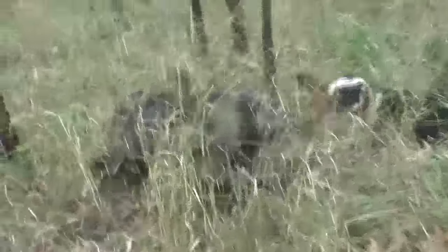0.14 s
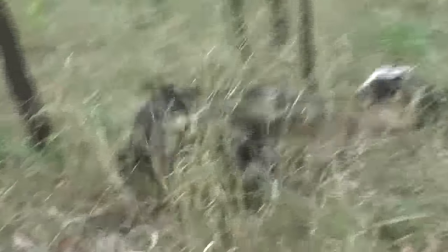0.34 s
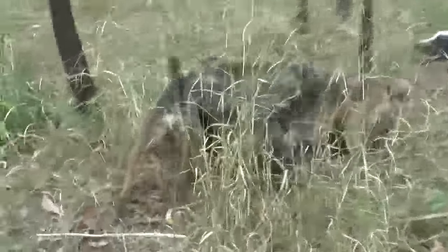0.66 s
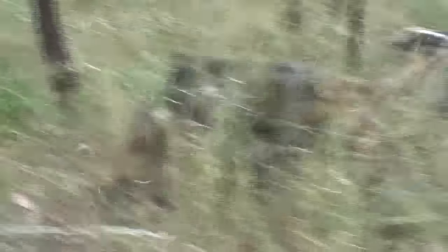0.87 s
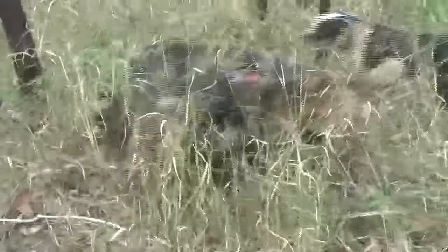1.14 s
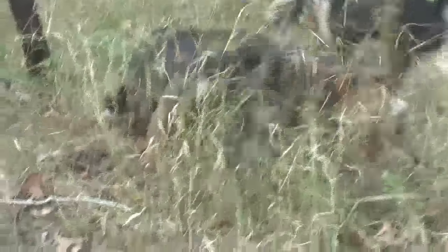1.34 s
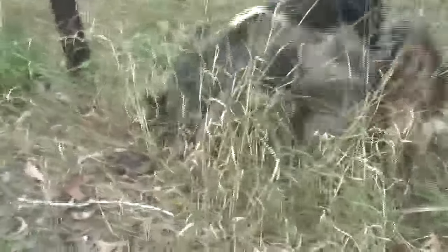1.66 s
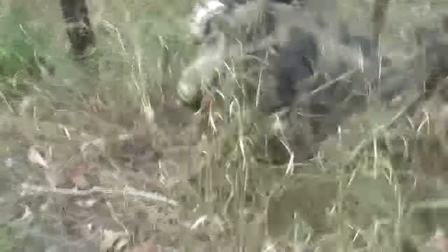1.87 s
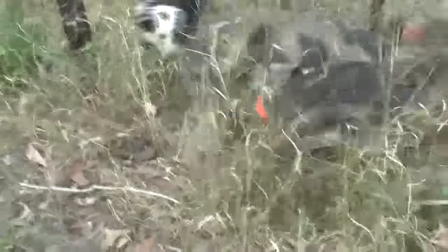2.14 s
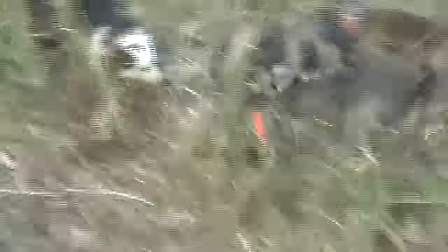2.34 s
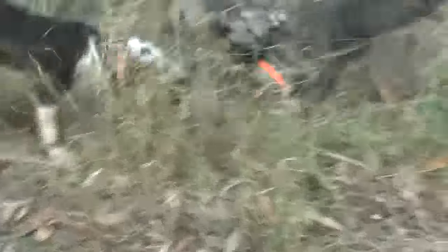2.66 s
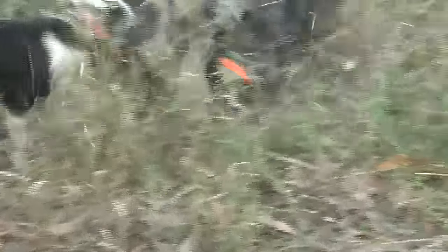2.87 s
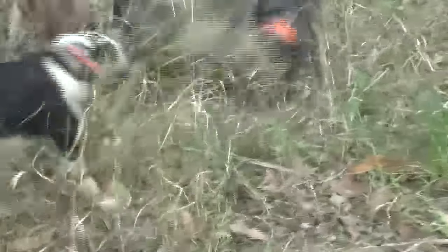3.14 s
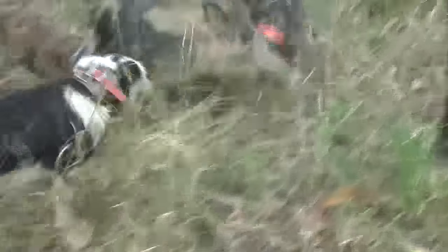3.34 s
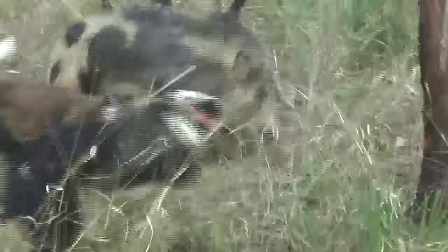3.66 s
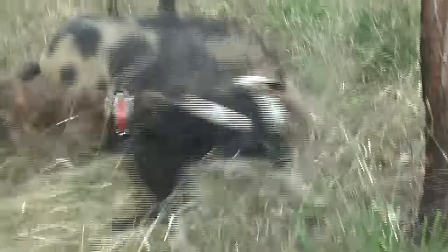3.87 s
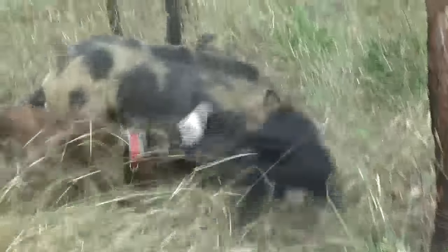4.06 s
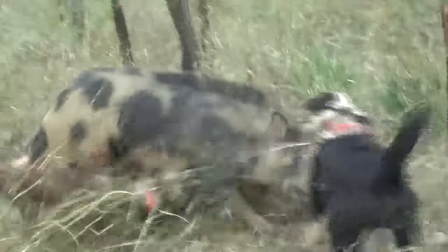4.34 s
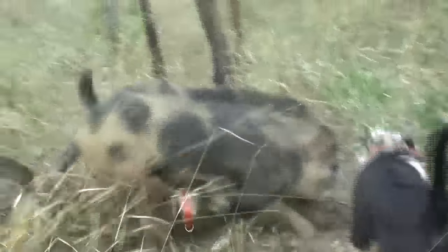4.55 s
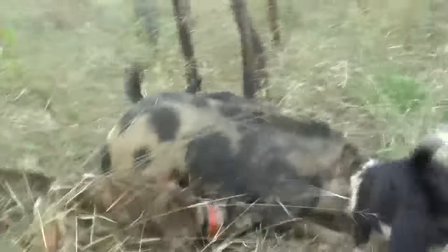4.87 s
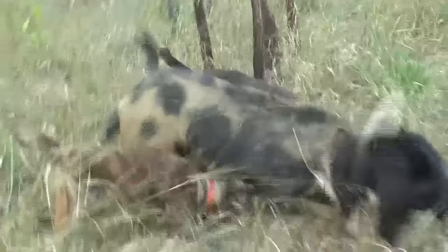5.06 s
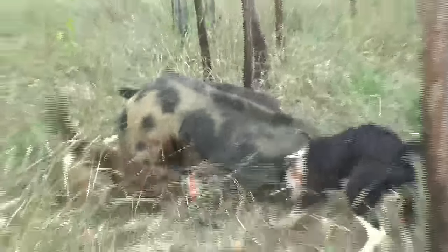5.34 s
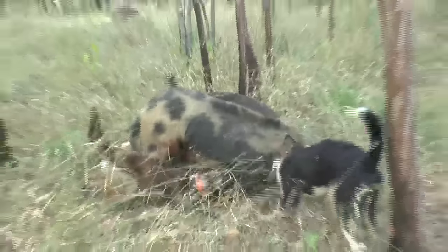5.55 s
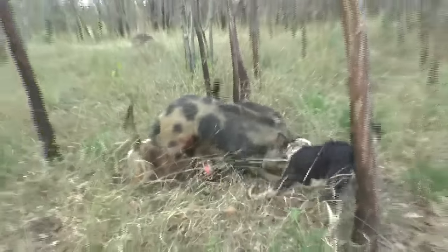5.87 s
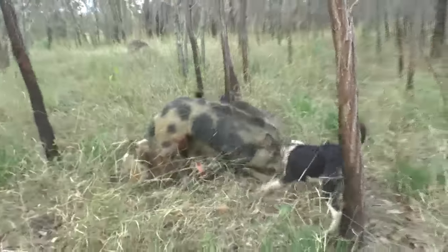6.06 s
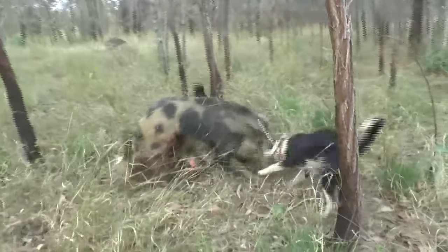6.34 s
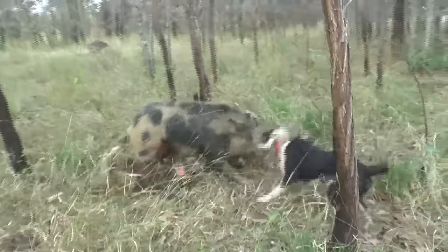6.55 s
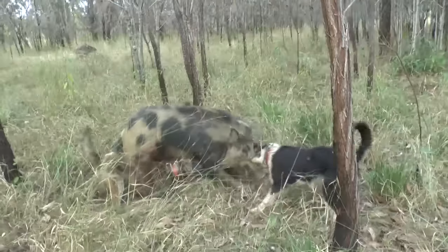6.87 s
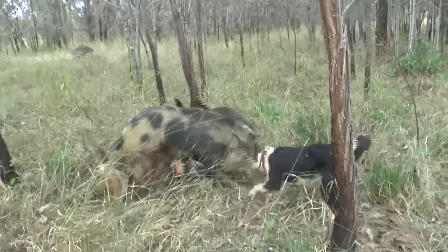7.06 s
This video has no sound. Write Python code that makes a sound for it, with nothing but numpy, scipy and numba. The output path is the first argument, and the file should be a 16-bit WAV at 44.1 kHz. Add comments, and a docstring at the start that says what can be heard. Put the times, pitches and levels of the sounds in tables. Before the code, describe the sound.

Dry grass rustles and snaps under a scuffle, with short strained boar squeals, throaty grunts and softer dog growls and panting.

```python
"""Open bushland: dogs hold a feral boar in dry grass a few metres away.
Strained vocal folds give short squeals that break into roughness, soft whines and low growls.
The boar grunts in slow throat pulses; muzzles pant; stalks crackle and snap underfoot over faint air.
The bout starts again after 5.2 s. A limiter ducks the grass under the loudest cries."""
import sys
import numpy as np
from scipy import signal
from scipy.fft import rfft, irfft, next_fast_len
from scipy.io import wavfile
from scipy.ndimage import uniform_filter1d, minimum_filter1d
from numba import njit

SR = 44100
rng = np.random.default_rng(int(sys.argv[2]) if len(sys.argv) > 2 else 0)


def store_pcm(level_fs):
    """Save levels as 16-bit WAV."""
    pcm = np.round(np.clip(level_fs, -1, 1) * 32767).astype(np.int16)
    wavfile.write(sys.argv[1], SR, np.atleast_2d(pcm).T)


N = 317961
BOUT_S = 5.2


def undb(db):
    """Decibels to gain."""
    return 10 ** (np.asarray(db) / 20)


def unit(x):
    """Scale to rms 1."""
    return x / np.sqrt(np.mean(np.abs(x) ** 2) + 1e-18)


def along(points, hz):
    """Read a (f/Hz, value) table on a log-frequency axis."""
    f, value = np.transpose(points)
    return np.interp(np.log(hz + 1), np.log(f), value)


def shape(x, response):
    """Filter by response(f/Hz)."""
    size = next_fast_len(x.shape[-1])
    hz = np.arange(size // 2 + 1) * SR / size
    return irfft(rfft(x, size) * response(hz), size)[..., :x.shape[-1]]


def resonance(hz, centre_hz, width_hz):
    """Complex gain of one resonance, 1 at its centre."""
    return 1j * hz * width_hz / (centre_hz ** 2 - hz ** 2 + 1j * hz * width_hz)


def wobble(size, hz):
    """Random motion, rms 1, rolled off above hz."""
    return unit(shape(rng.standard_normal(size), lambda f: np.exp(-.5 * (f / hz) ** 2)))


def ring(hz, t60_s, length_s=.08):
    """One struck resonance."""
    t = np.arange(int(length_s * SR)) / SR
    return np.sin(2 * np.pi * hz * t) * np.exp(-np.log(1000) * t / t60_s)


def burst(hz, width_hz, t60_s, length_s=.08):
    """Decaying noise in one resonance, peak 1."""
    t = np.arange(int(length_s * SR)) / SR
    noise = rng.standard_normal(len(t)) * np.exp(-np.log(1000) * t / t60_s)
    puff = shape(noise, lambda f: resonance(f, hz, width_hz))
    return puff / np.abs(puff).max()


def add(track, at_s, make):
    """Mix in a fresh make() at at_s in each bout."""
    for start_s in np.arange(at_s, N / SR, BOUT_S):
        i = max(int(start_s * SR), 0)
        sound = make()[:N - i]
        track[i:i + len(sound)] += sound


# air spectrum: f/Hz, level/dB
AIR_SPECTRUM = [(18, -40), (30, -13.5), (394, 4), (1000, 0), (2030, -2), (3230, -9.5), (6360, -20.5),
                (11900, -23), (15000, -25)]


def air(level_db=-38):
    """Faint moving air, independent in each channel."""
    noise = shape(rng.standard_normal((2, N)), lambda f: undb(along(AIR_SPECTRUM, f)))
    return unit(noise) * undb(level_db)


def scrub_echo(x, wet_db, t60_s, onset_s, centre_hz):
    """Trunks and scrub return a thin, band-limited tail."""
    t = np.arange(SR) / SR
    reflections = rng.standard_normal((2, SR)) * undb(2 * wobble(SR, 135))
    tail = reflections * np.exp(-np.log(1000) * t / t60_s) * (1 - np.exp(-(t / onset_s) ** 2))
    tail = shape(tail, lambda f: np.abs(resonance(f, centre_hz, 2900)))
    tail *= undb(wet_db) / np.sqrt(np.sum(tail[0] ** 2))
    return signal.fftconvolve(x[None], tail, axes=1)[:, :N]


def crackle(spectrum, per_s, spread_db, cluster_db, cluster_hz, pan_spread=.42):
    """Tiny fractures of random size and direction, swelling in clusters; a separate stream per octave."""
    out = 0
    clusters = undb(cluster_db * wobble(N, cluster_hz))
    count = int(per_s * N / SR)
    for octave in range(-1, 4):
        at = rng.integers(0, N, count)
        polarity = rng.choice([-1, 1], count)
        size = polarity * undb(spread_db * np.minimum(rng.exponential(size=count), 6))
        pan = pan_spread * rng.standard_normal(count)
        clicks = np.array([np.bincount(at, size * (1 + side * pan), N) for side in (1, -1)])

        def band(f):
            octaves_off = np.abs(np.log2(np.clip(f, 750, 12000) / 1500) - octave)
            return np.sqrt(np.maximum(1 - octaves_off, 0)) * undb(along(spectrum, f))

        out = out + shape(clicks * clusters, band)
    return out / np.std(out.mean(0))


# grass rustle, dipping after loud calls and recovering: t/s, level/dB
RUSTLE_LEVELS = [(0, -38.5), (.33, -38), (.52, -34.5), (1.05, -40), (1.65, -41), (1.92, -31), (2.28, -29.5),
                 (2.48, -33), (2.65, -28), (2.76, -54), (3.0, -40), (3.18, -31.5), (3.41, -29), (3.5, -47),
                 (3.72, -36), (4.05, -34.5), (4.48, -33.5), (4.92, -40), (5.03, -35), (5.2, -40)]
# swipes through tufts: t/s, lift/dB
TUFT_SWIPES = [(.185, 4.5), (.584, 1), (.986, 1.5), (1.29, 2), (1.443, 8.5), (1.93, 3.5), (2.04, 1),
               (2.12, 3.5), (2.272, 6), (2.587, 3.5), (3.175, 4.5), (3.348, 3.5), (3.752, 0.5),
               (3.826, 5.5), (4.781, 8), (5.165, 3)]
# stalk and blade spectra: f/Hz, level/dB
STALK_SPECTRUM = [(500, -12), (1000, -9.5), (2000, -0.5), (3200, 0.5), (4500, -0.5), (6300, 1.5),
                  (8000, -3.5), (10000, -13.5), (16000, -16)]
BLADE_SPECTRUM = [(4000, -4), (7500, -6), (9500, -1.5), (11500, -8), (13000, -5.5), (16000, -12.5)]


def grass(stalk_db=-31.5, blade_db=-37, mid_rustle_db=-34.5, rise_s=.046, fall_s=.049):
    """Stalks and fine blades crackle as bodies push through, leaping at each swipe."""
    t = np.arange(N) / SR % BOUT_S
    rustle_db = np.interp(t, *np.transpose(RUSTLE_LEVELS)) - mid_rustle_db
    for at_s, lift_db in TUFT_SWIPES:
        rustle_db += lift_db * np.interp(t, [at_s - rise_s, at_s, at_s + fall_s], [0, 1, 0])
    stalks = crackle(STALK_SPECTRUM, per_s=5000, spread_db=2, cluster_db=1.66, cluster_hz=37)
    blades = crackle(BLADE_SPECTRUM, per_s=6000, spread_db=2.6, cluster_db=1.4, cluster_hz=18)
    return stalks * undb(stalk_db + rustle_db) + blades * undb(blade_db + 1.15 * rustle_db)


# low rustle: t/s, level/dB
LOW_RUSTLE_LEVELS = [(0, -43), (.3, -48.5), (.72, -38.5), (.9, -45.5), (1.33, -42), (1.53, -34),
                     (1.95, -35), (2.6, -39), (2.8, -47), (2.95, -37), (3.3, -45), (3.52, -32.5),
                     (3.78, -50), (4.0, -31.5), (4.7, -47), (5.03, -35.5), (5.2, -46)]
# its spectrum: f/Hz, level/dB
LOW_RUSTLE_SPECTRUM = [(20, -20), (45, -7), (90, 2.5), (200, 1), (400, 3), (700, -2.5), (1200, 0),
                       (2500, -7), (6000, -39)]


def low_rustle():
    """A low, dull rustle comes and goes."""
    level_db = np.interp(np.arange(N) / SR % BOUT_S, *np.transpose(LOW_RUSTLE_LEVELS))
    rustle = crackle(LOW_RUSTLE_SPECTRUM, per_s=1500, spread_db=1.7, cluster_db=2.2, cluster_hz=25)
    return rustle * undb(level_db)


# steps, and a thump at the start of one grunt: t/s, level/dB
LOW_THUDS = [(0.083, -29), (0.473, -21), (0.711, -16.5), (1.016, -25), (1.7, -22.5), (1.888, -18.5),
             (2.579, -21), (2.628, -19), (3.149, -25), (3.181, -25), (3.411, -25), (4.898, -27)]


def thuds():
    """Low thuds: a short knock over a longer bass thump."""
    out = np.zeros(N)
    for at_s, db in LOW_THUDS:
        add(out, at_s, lambda: undb(db) * (burst(520, 320, t60_s=.032) + .5 * burst(170, 180, t60_s=.085)))
    return out


# breaking stalks: t/s, peak/dB, centre/Hz
STALK_SNAPS = [(0.1755, -21, 2970), (0.1995, -16, 6620), (0.382, -32.5, 4570), (0.394, -21, 3740),
               (0.5794, -11.5, 5140), (0.9824, -14.5, 2890), (1.4285, -27, 4740), (1.448, -19, 5100),
               (2.116, -8, 2630), (2.585, -4, 5710), (2.607, -19, 5870), (3.342, -14, 6730),
               (4.9805, -14, 5200), (4.9934, -15, 5340), (5.16, -16, 5860)]


def snaps():
    """Single stalks break with a bright click."""
    out = np.zeros(N)
    for at_s, db, hz in STALK_SNAPS:
        add(out, at_s, lambda: undb(db) * burst(hz, width_hz=4000, t60_s=.016))
    return out


def breath(half_s, hz, width_hz, flutter_db=2.2):
    """Air forced through a muzzle, swelling and fading."""
    size = int(2 * half_s * SR)
    hiss = shape(rng.standard_normal(size), lambda f: np.abs(resonance(f, hz, 1.33 * width_hz)) ** 2)
    return unit(hiss) * np.hanning(size) * undb(flutter_db * wobble(size, 31))


# breaths: middle/s, half length/s, level/dB, centre/Hz, nominal width/Hz
BREATHS = [ (0.128, 0.15, -36.5, 2200, 1100), (0.278, 0.083, -34.5, 1060, 700),
           (0.405, 0.059, -22.5, 4070, 1870), (0.46, 0.22, -34.5, 1900, 1200),
           (0.746, 0.11, -35, 1250, 990), (0.91, .11, -35, 1700, 900), (1.661, 0.12, -31, 970, 980),
           (1.915, 0.089, -27, 1840, 450), (1.98, 0.027, -32, 1800, 300), (2.07, 0.067, -30.5, 1460, 400),
           (2.237, 0.17, -28.5, 1240, 590), (2.416, 0.062, -28, 1530, 350), (2.917, 0.087, -33, 1920, 1000),
           (3.018, 0.1, -36, 1140, 900), (3.179, 0.075, -23.5, 1150, 1320), (3.66, 0.14, -35, 990, 704),
           (3.88, 0.14, -26, 1510, 1010), (5.057, 0.085, -34.5, 2400, 1400)]


def pants(trim_db=-1.5):
    """The animals pant and snort between cries."""
    out = np.zeros(N)
    for middle_s, half_s, db, hz, width_hz in BREATHS:
        add(out, middle_s - half_s, lambda: undb(db + trim_db) * breath(half_s, hz, width_hz))
    return out


def voice(course, throat_width_hz, mouth_width_hz, top_hz, leak_db,
          jitter, rasp, rasp_hz, subharmonic, hiss, throb):
    """Folds and breath sound the tract; strain shakes the pitch, doubles the period, smears harmonics."""
    knots_s, *columns = np.transpose(course)
    t = np.arange(knots_s[0], knots_s[-1], 1 / SR)
    pitch_hz, db, rough, throat_hz, mouth_hz, mouth_db = (np.interp(t, knots_s, c) for c in columns)
    rough = np.clip(rough, 0, 1)
    size, out = len(t), 0

    def tract(hz):
        """Throat and mouth resonances; soft tissue lets little treble leak out."""
        throat = resonance(hz, throat_hz, throat_width_hz)
        mouth = undb(mouth_db) * resonance(hz, mouth_hz, mouth_width_hz)
        leak = undb(leak_db + mouth_db) / (1 + (hz / 8000) ** 8)
        return (throat - mouth) / (1 + (hz / (top_hz + mouth_hz / 2)) ** 20) + leak

    def flutter(hz):
        """Random amplitude and phase."""
        return wobble(size, hz) + 1j * wobble(size, hz)

    phase = 2 * np.pi * np.cumsum(pitch_hz * (1 + jitter * rough * wobble(size, 151))) / SR
    for k in np.arange(2, 33) / 2:
        steady = subharmonic * rough if k % 1 else 1
        smear = rasp * rough * flutter(rasp_hz)
        out = out + tract(k * pitch_hz) * (steady + smear) * np.exp(1j * k * phase)
    for hz in np.arange(300, 3400, 150):  # turbulence bands
        out = out + tract(hz) * hiss * rough * flutter(95) * np.exp(2j * np.pi * hz * t)
    # the lungs push steadily, however ragged the folds
    out = out.real / np.sqrt(uniform_filter1d(np.abs(out) ** 2, size=400) / 2 + 1e-12)
    tremor = 1 + throb * rough * wobble(size, 70)
    return signal.windows.tukey(size, .04) * out * undb(db) * tremor


HIGH_VOICE = dict(throat_width_hz=273, mouth_width_hz=234, top_hz=1883, leak_db=-36.5,
                  jitter=.0686, rasp=.39, rasp_hz=101, subharmonic=.45, hiss=.56, throb=.26)
LOW_VOICE = dict(throat_width_hz=160, mouth_width_hz=42, top_hz=1390, leak_db=-45,
                 jitter=.0556, rasp=.93, rasp_hz=40, subharmonic=.17, hiss=.12, throb=.35)

# whines and growls: start/s, loudest/s, end/s, first pitch/Hz, last pitch/Hz, level/dB,
# roughness/0-1, first throat/Hz, last throat/Hz, mouth/Hz, mouth/dB
WHINE_CALLS = [(2.82, 2.997, 3.09, 804, 865, -31, 0.58, 760, 850, 1500, -22),
               (3.281, 3.34, 3.4, 306, 239, -31.5, 0, 567, 400, 1410, -41),
               (3.548, 3.683, 3.745, 820, 735, -31.5, .5, 820, 750, 1450, -3)]
GROWL_CALLS = [(.31, .47, .78, 177.6, 161.4, -32.5, 0.97, 362, 352, 806, -3.5),
               (2.1, 2.207, 2.34, 195.9, 220, -22, 0.87, 150, 435, 838, 8.5),
               (3.37, 3.389, 3.45, 227.6, 177.5, -22, 0.5, 255, 338, 1400, -28),
               (4.333, 4.474, 4.66, 107.4, 120.6, -28.5, .7, 206, 434, 616, -11)]


def soft_calls(calls, timbre, arch_db=13.5):
    """Whines or growls: the level arches while pitch and throat slide."""
    out = np.zeros(N)
    for start_s, top_s, end_s, first_hz, last_hz, db, rough, throat0_hz, throat1_hz, *mouth in calls:
        t = np.linspace(start_s, end_s, 21)
        pitch_hz = np.linspace(first_hz, last_hz, len(t))
        throat_hz = np.linspace(throat0_hz, throat1_hz, len(t))
        level_db = db - arch_db * np.interp(t, [start_s, top_s, end_s], [1, 0, 1]) ** 1.73
        course = np.column_stack(np.broadcast_arrays(t, pitch_hz, level_db, rough, throat_hz, *mouth))
        add(out, start_s, lambda: voice(course, **timbre))
    return out


def fold_slap(throat_hz, mouth_hz, mouth_db, spit_db):
    """Slack vocal folds slap once, ringing chest, throat and mouth with a spit of air."""
    throat = .85 * ring(throat_hz * 1.08, t60_s=.024) + .32 * ring(throat_hz * .92, t60_s=.065)
    mouth = ring(mouth_hz * .92, t60_s=.021) - ring(mouth_hz * 1.094, t60_s=.015)
    spit = burst(2900, 2200, t60_s=.018)
    chest = .097 * ring(217, t60_s=.039)
    slap = -throat - chest + undb(mouth_db) * .7 * mouth + undb(spit_db) * spit
    delay_s = rng.uniform(.0026, .00379)
    ground_bounce = lambda f: 1 + .35 * np.exp(-2j * np.pi * f * delay_s)
    radiation = lambda f: 1j * f / (1j * f + 110)  # small mouth, no deep bass
    return shape(slap, lambda f: radiation(f) * ground_bounce(f))


# grunts: start/s, end/s, pulse count, slowing/ratio, level/dB, swell/dB,
# throat/Hz, mouth/Hz, mouth/dB, spit/dB
BOAR_GRUNTS = [(1.3733, 1.4815, 6, .13, -11, 7, 482, 2225, -3, -2.5),
               (3.427, 3.484, 4, -0.42, -22.5, -11.5, 390, 1660, 18.5, 3),
               (4.0548, 4.111, 4, .12, -8, 6, 465, 1550, -0.5, -7),
               (4.788, 4.871, 5, 0.16, -12.5, 5, 418, 1550, -2.5, -1.5)]


def grunts(opening_share=.52, shut_db=-7.5):
    """Runs of fold slaps as the boar's mouth opens; most swell, and slow as the air runs out."""
    out = np.zeros(N)
    for start_s, end_s, count, slowing, db, swell_db, throat_hz, mouth_hz, mouth_db, spit_db in BOAR_GRUNTS:
        for progress in np.linspace(0, 1, count):
            at_s = start_s + (end_s - start_s) * (progress - slowing * progress * (1 - progress))
            closure = max(1 - progress / opening_share, 0)
            gain = undb(db - swell_db * closure)
            mute_db = shut_db * closure
            add(out, at_s,
                lambda: gain * fold_slap(throat_hz, mouth_hz, mouth_db + mute_db, spit_db + mute_db))
    return out


# one course per squeal: t/s, pitch/Hz, level/dB, roughness/0-1, throat/Hz, mouth/Hz, mouth/dB
SQUEAL_COURSES = [
    [(1.088, 434.7, -10.5, 0.79, 840, 2520, 0), (1.108, 475.3, -5.5, .45, 940, 2500, 4),
     (1.122, 475, -10, .45, 940, 2480, -2), (1.145, 517.3, -13, 0.15, 820, 2160, 7.5),
     (1.19, 525, -7.5, 0, 733, 2130, 8.5), (1.228, 571, -8.5, 0.08, 790, 2280, 8),
     (1.24, 531, -7, 0.17, 880, 2220, 5.5)],
    [(2.656, 474.5, -10.5, 0.2, 614, 1950, -1), (2.668, 681, -7.5, 0, 760, 1650, 15),
     (2.685, 784.5, -7, .2, 776, 1500, 0), (2.693, 590, -10, 0.48, 980, 1350, 12),
     (2.714, 771, -3.5, .32, 1410, 2140, -4), (2.738, 772, -6, 0.47, 1110, 1620, 3),
     (2.768, 586, -15, 0.76, 1130, 1650, 0), (2.787, 656, -16.5, 0.4, 626, 1420, 4.5)],
    [(4.111, 437.6, -8.5, 0.9, 520, 1870, 7), (4.123, 640, -7, 0.27, 900, 2310, -5),
     (4.138, 900, 2, 0.42, 880, 1900, -18), (4.18, 1017, 9, 0.34, 1000, 1900, -4.5),
     (4.199, 1244, 6, 0.6, 1140, 2080, -26), (4.213, 966, 2, 0.7, 1030, 1820, 1),
     (4.226, 752, -1.5, 0.3, 796, 1700, -19), (4.24, 683, 0, 0.3, 700, 1750, -22)],
]


def squeals(attack_s=.011, scoop=.92, release_s=.03, sag=.81, edge_db=-22, fray=.12):
    """Loud, strained cries scoop up to pitch and sag out of it, quiet and frayed at both edges."""
    def edge(knot, shift_s, bend):
        at_s, pitch_hz, db, rough, *tract = knot
        return (at_s + shift_s, pitch_hz * bend, db + edge_db, rough + fray, *tract)

    out = np.zeros(N)
    for body in SQUEAL_COURSES:
        course = [edge(body[0], -attack_s, scoop), *body, edge(body[-1], release_s, sag)]
        add(out, course[0][0], lambda: voice(course, **HIGH_VOICE))
    return out


# left minus right at the microphone: f/Hz, level/dB
MIC_BALANCE = [(40, -1), (90, -3), (180, -7), (350, -12.5), (700, -5), (1400, -2.7), (2600, -3.7),
               (5500, -9), (9000, -4.2), (13500, -11)]
# left port's lead over the right: f/Hz, phase/rad
MIC_PHASE = [(30, 0), (120, 0), (260, -.4), (520, .8), (1210, .2), (2670, -.1), (7500, .2), (16000, 0)]


def microphone(field):
    """Two ports differ in level and phase; the sound leans right."""
    balance = lambda f: 2 / (1 + undb(np.outer([-1, 1], along(MIC_BALANCE, f))))
    phase = lambda f: np.exp(.5j * np.outer([1, -1], along(MIC_PHASE, f)))
    return shape(field, lambda f: balance(f) * phase(f))


def scene(ground_pan_db=-1.53):
    """Calls and grunts echo in the scrub, over rustle, thuds, snaps and faint air."""
    calls = squeals() + soft_calls(WHINE_CALLS, HIGH_VOICE) + soft_calls(GROWL_CALLS, LOW_VOICE) + pants()
    boar = grunts()
    background = air()
    call_echo = scrub_echo(calls, wet_db=-33, t60_s=.55, onset_s=.015, centre_hz=2400)
    boar_echo = scrub_echo(boar, wet_db=-15.5, t60_s=.13, onset_s=.012, centre_hz=500)
    ground = grass() + low_rustle() + thuds() + snaps()
    ground *= undb(np.array([[1], [-1]]) * ground_pan_db / 2)
    return microphone(background + call_echo + boar_echo + ground + calls + boar)


@njit
def follow(x, attack, release):
    """Level detector with separate rise and fall rates."""
    out, level = np.empty(len(x)), 0.
    for i in range(len(x)):
        level += (x[i] - level) * (attack if x[i] > level else release)
        out[i] = level
    return out


def record(dry, ceiling_db=-6.5, attack_s=.00037, hold_s=.014, release_s=.011, top_hz=16000):
    """A limiter with a short hold ducks the whole mix under loud cries; then clip and low-pass."""
    level = follow(np.abs(dry).max(0), 1 / (attack_s * SR), 1 / (release_s * SR))
    reach = int(hold_s * SR / 2)
    held = -minimum_filter1d(-level, size=2 * reach + 1, origin=reach)
    limited = dry / (1 + (held / undb(ceiling_db)) ** 4) ** (1 / 4)
    lowpass = signal.ellip(10, .1, 80, top_hz, fs=SR, output="sos")
    return signal.sosfilt(lowpass, np.clip(limited, -1, 1))


dry = scene()
out = record(dry)
store_pcm(out)
```